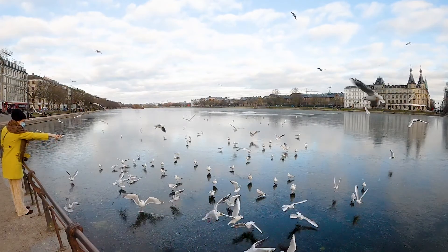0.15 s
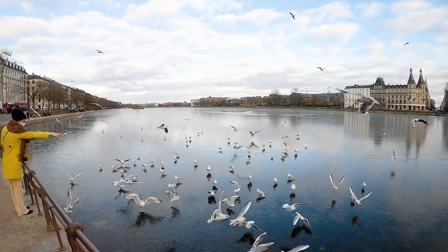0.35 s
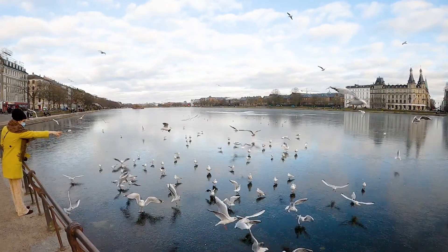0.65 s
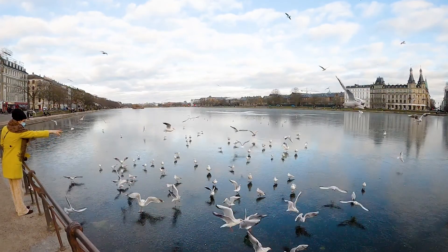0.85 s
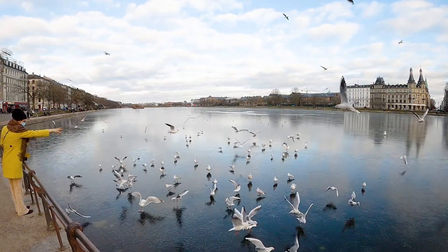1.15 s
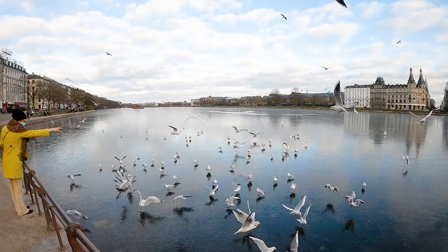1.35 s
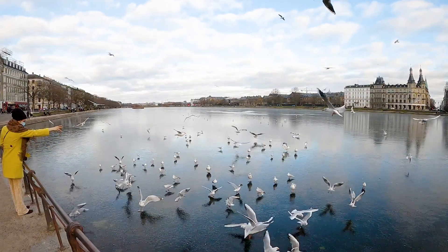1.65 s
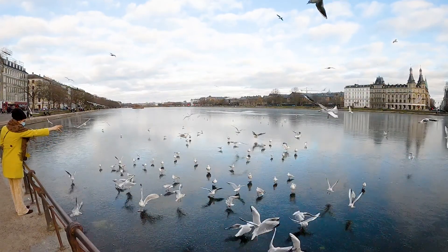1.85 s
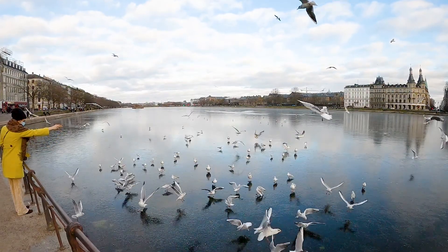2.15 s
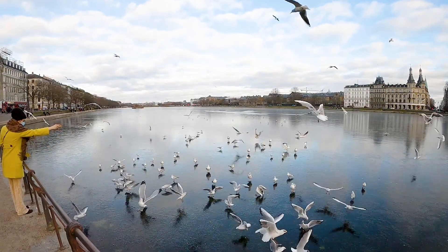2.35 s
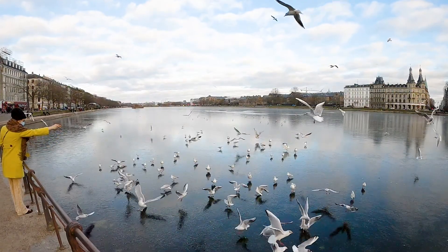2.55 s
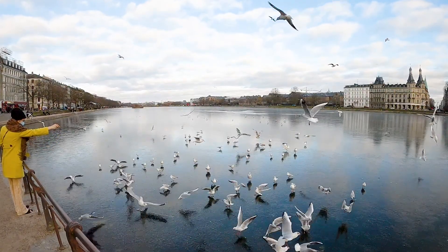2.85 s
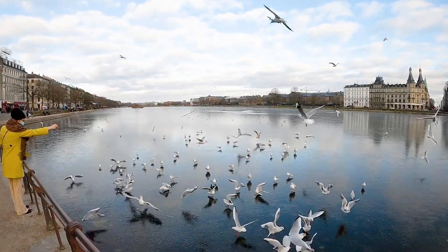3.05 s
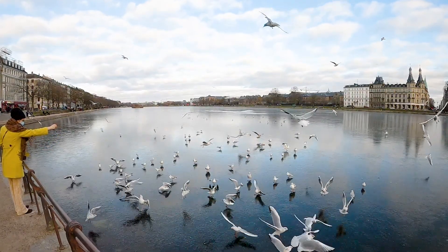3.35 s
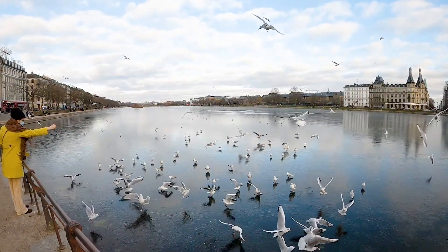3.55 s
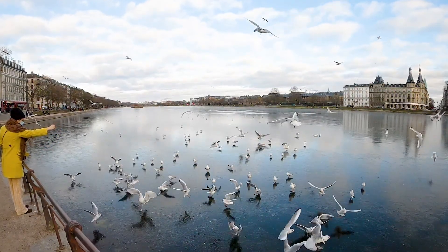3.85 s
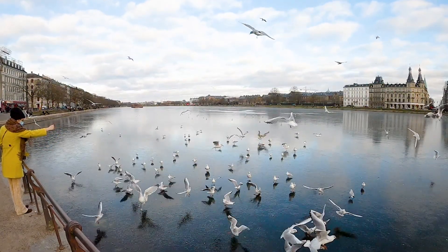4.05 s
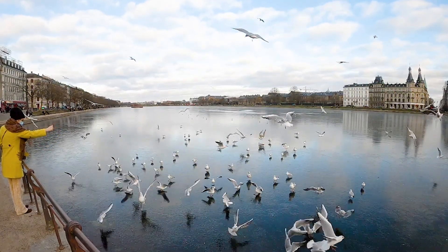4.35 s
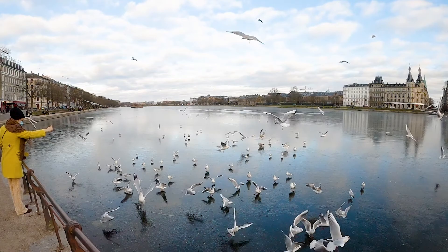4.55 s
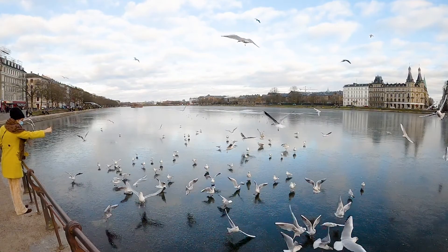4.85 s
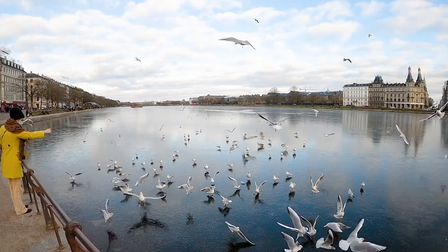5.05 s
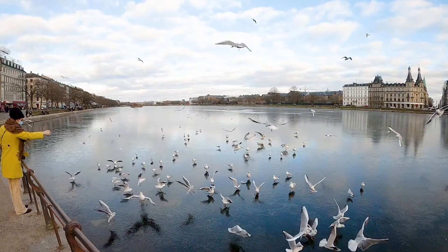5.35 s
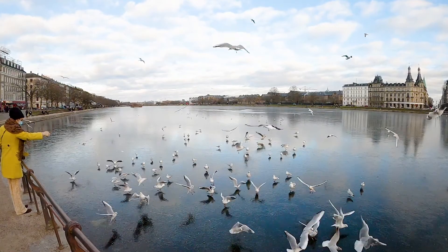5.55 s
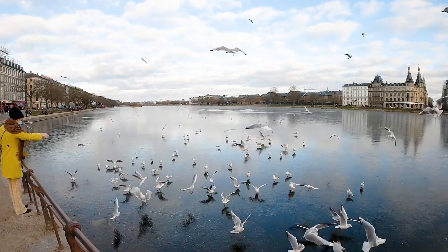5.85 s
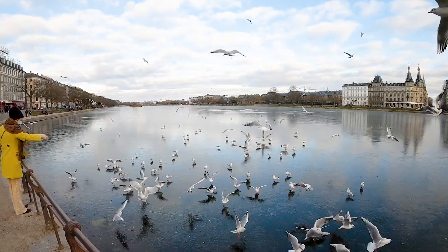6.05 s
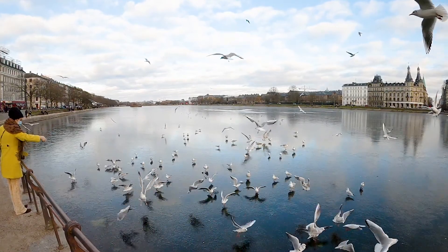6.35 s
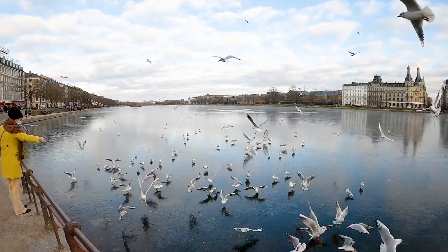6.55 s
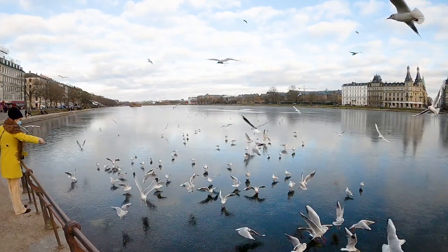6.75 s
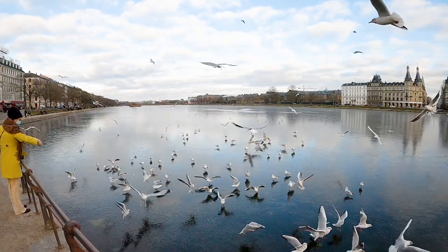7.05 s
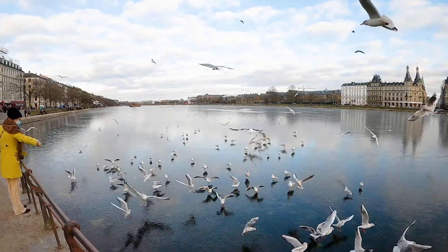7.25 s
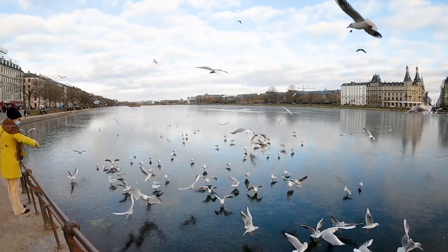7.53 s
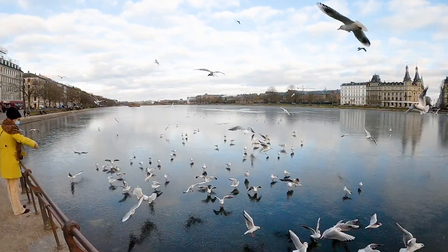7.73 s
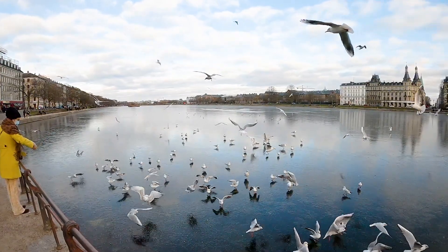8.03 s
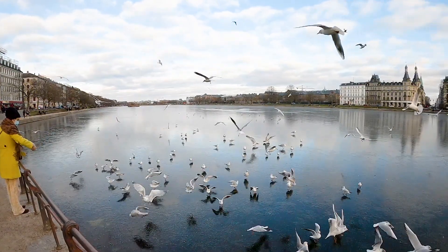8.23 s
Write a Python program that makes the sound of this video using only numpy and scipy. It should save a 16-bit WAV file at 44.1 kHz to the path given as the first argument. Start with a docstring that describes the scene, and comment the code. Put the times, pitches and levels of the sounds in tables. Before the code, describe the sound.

Gulls squabble over food on a frozen city lake, harsh rasping calls bunching into a loud growling peak, over a low distant town hum.

```python
"""Two claw ticks on ice over a town's far rumble and hum, then gulls squabbling over bread at a frozen city lake.
A small mono microphone hears it all: rasps are pulse trains chopped by a flutter and rung through chest, throat
and beak; whistles and cries are stacks of harmonics on bending pitches; claws and beaks are short noise cracks.
Duller rasps further out make the crowd, the shore returns a short tail, and shaped noise and a wavering tone
make the town."""
import sys
import numpy as np
from scipy import signal
from scipy.fft import rfft, irfft, next_fast_len
from scipy.io import wavfile
from scipy.ndimage import uniform_filter1d

SR = 44100
rng = np.random.default_rng(int(sys.argv[2]) if len(sys.argv) > 2 else 0)


def put_to_file(sound):
    """Save the sound as 16-bit audio at rate SR, in the file named by the first command-line argument."""
    columns = np.atleast_2d(sound).T  # one column per channel
    safe = np.clip(columns, -1, 1)
    whole_steps = np.round(safe * 32767)
    wavfile.write(sys.argv[1], SR, whole_steps.astype(np.int16))


N = 369999  # samples

# Spectrum of the distant town and microphone hiss, set to TOWN_DB overall.
# Each row: frequency in Hz, relative density in dB per Hz.
TOWN_SPECTRUM = [(15, -1.5), (54, 1.5), (100, -6.5), (360, -16.5), (664, -19), (1000, -18.5), (1600, -23),
                 (2400, -35.5), (3900, -36), (6100, -45.5), (7600, -32), (10000, -39.5), (15000, -41.5)]
# Heavy traffic swelling in the bass. Each row: time in seconds, change of level in dB.
TRAFFIC_SWELL = [(0, 4), (1.001, 0), (2.501, 2.5), (2.901, 2.5), (3.5, -1), (7.799, -4), (8.39, 0)]
# The far machine hum. Each row: time in seconds, level in dB.
HUM_LEVEL = [(0.0, -53.5), (1.31, -53.5), (2.45, -50.5), (3.74, -49.5), (3.76, -58.5), (4.49, -45),
             (7.219, -54), (7.27, -60), (8.39, -59)]
# How loudly the birds further out join in. Each row: time in seconds, gain in dB.
CROWD_GAIN = [(0, -63.5), (1.1, -59.5), (1.4, -39), (1.9, -39.5), (2.2, -39.5), (2.5, -44), (2.65, -52.5),
              (3.7, -63.5), (4.3, -88), (5.5, -54.5), (5.9, -48.5), (6.05, -37.5), (6.36, -45.5),
              (6.7, -69), (7.35, -83), (7.62, -53.5), (7.95, -68.5), (8.39, -65)]
# Claws and beaks on the ice. Each row: start in seconds, nominal peak in dB.
ICE_TICKS = [(0.0205, -33), (0.043, -29.5), (2.951, -17.5), (3.0164, -21.5), (3.384, -29.5), (3.8, -33),
             (7.4672, -27), (7.699, -29.5), (7.83, -32), (8.325, -33)]
# Whistles, nearly pure. Each row: nominal start and end in seconds, first, middle and last pitch in Hz,
# swell from start to end in dB, level in dB.
WHISTLE_CALLS = [(0.04, 0.07, 5060, 6740, 7670, 21, -44.5), (0.06, 0.108, 2450, 2578, 2670, 1, -53),
                 (1.328, 1.38, 3420, 3710, 3700, 13, -26.5), (1.384, 1.582, 4235, 4317, 4420, -21, -30.5),
                 (1.556, 1.609, 4200, 4344, 3990, -4, -23.5), (1.637, 1.703, 3800, 3570, 3360, -16, -25.5),
                 (1.709, 1.791, 3500, 2886, 2480, 5, -29), (1.65, 1.865, 2172, 2140, 2140, -1, -36),
                 (1.857, 1.918, 1345, 1210, 1440, 3, -33.5), (1.911, 2.022, 2170, 2227, 2350, 0, -29),
                 (1.931, 1.992, 3540, 3600, 3770, -2, -23), (2.067, 2.098, 8266, 7700, 7230, 9, -35.5),
                 (2.082, 2.119, 2640, 2490, 2510, 6, -18), (2.365, 2.41, 5460, 5450, 5440, 2, -47),
                 (2.59, 2.632, 6400, 6300, 6300, 2, -47), (1.446, 1.53, 1000, 1005, 937, 2, -34.5),
                 (1.7, 1.711, 3920, 3870, 3720, -3.5, -23.5), (4.026, 4.146, 3870, 4240, 3960, -10.5, -52),
                 (4.09, 4.244, 3040, 3003, 2920, 10, -47), (4.123, 4.21, 3710, 3910, 3830, 7, -49.5),
                 (4.196, 4.235, 3650, 3520, 3430, 13, -42.5), (5.935, 5.957, 2320, 2200, 2180, -14, -30),
                 (7.722, 7.758, 6000, 5950, 5600, 8, -51), (5.896, 5.915, 2230, 2230, 2197, -7, -32.5),
                 (6.321, 6.355, 3200, 3180, 3150, 3, -24), (6.378, 6.416, 8030, 7800, 7300, -19, -42),
                 (6.432, 6.469, 7150, 7480, 7050, -1, -47), (7.135, 7.185, 5130, 5000, 4965, -6, -53),
                 (7.42, 7.442, 5950, 7230, 7350, 4, -50), (7.684, 7.72, 4200, 4150, 4050, 0, -51),
                 (7.72, 7.746, 3720, 3720, 3580, 0, -48)]
# Cries, rich in harmonics. Each row: nominal start and end in seconds, first, middle and last pitch in Hz,
# swell from start to end in dB, level in dB, beak ring in Hz, fall away from it in dB per octave,
# second ring in Hz and its relative level in dB, roughness from 0 to 1.
CRY_CALLS = [(0.173, 0.367, 992, 983, 944, -4.5, -34, 4000, 61, 8130, -10.5, 0.085),
             (0.154, 0.283, 2960, 2870, 2910, -12, -56.5, 2940, 30, 5800, -6, .1),
             (0.277, 0.397, 2890, 2890, 2880, 10, -49, 2900, 13, 5800, 2, 0.072),
             (0.384, 0.585, 1410, 1400, 1375, -5, -50, 2803, 45, 5640, 7.5, 0.032),
             (1.299, 1.414, 764, 754, 736, -11, -30, 1540, 19, 2950, -5.5, 0.078),
             (2.142, 2.172, 490, 489, 482, 8, -23, 2000, 34, 3800, -7.5, 0.5),
             (3.928, 3.968, 2960, 2700, 2690, 10, -31.5, 2700, 26, 5400, -9, 0.078),
             (3.971, 4.039, 3200, 3044, 3130, -7, -34, 3054, 24, 6100, -18.5, .1),
             (4.235, 4.401, 2910, 2848, 2770, -2, -38, 2870, 24, 5740, -15.5, 0.048),
             (5.572, 5.749, 1197, 1236, 1184, 3.5, -41, 2180, 9.7, 3620, -3.5, 0.31),
             (5.736, 5.94, 2980, 2970, 2790, 12, -37, 2950, 24, 5900, -18, 0.43),
             (5.747, 5.922, 4240, 4290, 4150, 4, -47, 4220, 24, 8500, -15, 0.69),
             (5.751, 5.988, 1278, 1303, 1203, -6, -42.5, 1280, 24, 2600, -12, 0.78),
             (5.997, 6.116, 720, 685, 664, -11.5, -32.5, 2560, 13.4, 5500, -7.5, 0.3),
             (6.087, 6.268, 1113, 1105, 1030, 4, -27, 3100, 27, 5360, -12, .2),
             (6.191, 6.346, 427, 450, 391, -5, -39, 890, 14.5, 1700, -25, 0.098),
             (6.271, 6.313, 625, 636, 644, 14, -36, 3200, 30, 6160, -8, 0.33),
             (6.789, 6.819, 882, 850, 800, -4, -32.5, 1740, 28, 3480, -9.5, 0.39),
             (6.862, 6.896, 2260, 2180, 2180, 10, -35, 2170, 30, 6500, -18, 0.092),
             (6.899, 7.255, 2141, 2073, 1950, -16, -40.5, 2100, 16, 7550, -15, 0.029),
             (7.44, 7.46, 1230, 1210, 1210, 5, -54, 2418, 21, 4800, 8, 0.49),
             (7.454, 7.5, 1343, 1335, 1310, 10, -43, 2620, 18, 5130, 1.5, 0.65),
             (7.557, 7.68, 990, 972, 894, -7, -49.5, 3850, 48, 4770, -5, 0.66),
             (7.737, 7.794, 744, 695, 700, 8, -52, 2860, 23, 5030, -4, 0.72),
             (7.787, 7.858, 679, 676, 720, 5, -39, 2840, 44, 5170, -5, 0.23)]
# Harsh calls of the near gulls. Each row: loudest throb in seconds, rise and fall in seconds, mean pitch in Hz,
# glide in percent, level in dB, chest in dB, middle throat ring in Hz, throb rate in Hz, throb depth from 0 to 1.
RASP_CALLS = [(0.239, 0.044, 0.028, 612, 2, -47, 16, 3040, 58.6, 0.4),
              (0.684, 0.034, 0.034, 728, -4.5, -40.5, 12.5, 2840, 63, 0.5),
              (0.873, 0.04, 0.039, 826, 5, -21, -4, 2400, 59, 0.84),
              (1.073, 0.035, 0.028, 699, -3.5, -13.5, -8.5, 2300, 81, 0.78),
              (1.194, 0.052, 0.039, 884, -2.5, -9, -4.5, 3260, 65, 0.6),
              (1.281, 0.047, 0.09, 838, -1.5, -9.5, -1, 3000, 64.5, 0.6),
              (1.494, 0.057, 0.033, 1083, -2, -7.5, -7, 3220, 84, 0.6),
              (1.655, 0.1, 0.14, 738, 5, -22.0, -6, 3250, 56.3, 0.54),
              (1.755, 0.043, 0.023, 899, -0.5, -7.5, -16, 2570, 43.3, 0.25),
              (1.823, 0.059, 0.058, 813, 3.5, -26, 3, 2460.0, 60.0, 0),
              (1.952, 0.094, 0.13, 1055, 7.0, -17, -4.5, 3000, 64, 0),
              (2.072, 0.045, 0.1, 935, 0, -14, 0.5, 2680, 59, 0.7),
              (2.217, 0.048, 0.15, 312.7, -2, -6, -8, 3030, 136, 0.65),
              (2.32, 0.056, 0.088, 291.7, 1.5, 0, -22, 2830, 59, 0.64),
              (2.399, 0.067, 0.044, 326.8, 1, -6.5, -6, 3150, 53.7, 0.83),
              (2.451, 0.019, 0.078, 282, 0.0, -4, -16, 3220, 46, 0.13),
              (2.53, 0.039, 0.046, 891, 4.0, -10, -2, 2740, 67.3, 0.8),
              (2.708, 0.051, 0.041, 914, 4, -26, 3.5, 2650, 60, 0.6),
              (2.797, 0.067, 0.074, 883, -4, -20, 0.5, 2720, 58, 0.68),
              (3.027, 0.061, 0.034, 583, 13.5, -18.5, -37, 2130, 67, 0.67),
              (3.078, 0.045, 0.039, 764, -4, -23, -1.5, 2660, 66.83, 0.8),
              (3.333, 0.059, 0.029, 734, 2.5, -23.5, 1, 2720, 64.6, 0.7),
              (3.521, 0.061, 0.039, 692, -0.5, -29, 2, 3170, 53, 0.75),
              (3.572, 0.034, 0.048, 837, 8, -19.5, 1, 2650, 69, 0.6),
              (3.628, 0.065, 0.026, 1025, 9, -43.5, 21.5, 2480.0, 66, 1),
              (3.856, 0.047, 0.031, 727, 19.5, -31, 8, 3460, 63, 0.7),
              (4.688, 0.03, 0.042, 860, 3, -27, 2.5, 3540, 68, 0.96),
              (4.872, 0.051, 0.05, 830, -0.5, -19, -1, 3070, 57, 1),
              (4.947, 0.043, 0.053, 632.5, 1.5, -28.5, 4.5, 2640, 65, 1),
              (5.022, 0.022, 0.012, 685.4, 5, -30, -3, 3700, 47.0, 0.7),
              (5.102, 0.025, 0.019, 800, -0.5, -38.5, 1, 3000, 70, 0.6),
              (5.164, 0.032, 0.029, 698, 1.5, -30.5, 9, 2960, 69, 0.99),
              (5.291, 0.026, 0.035, 713, -5.5, -21.5, 5.5, 3400, 82, 0.5),
              (5.346, 0.034, 0.022, 653, 3.5, -23, 3.5, 3600, 73.3, 0.9),
              (5.433, 0.034, 0.031, 589, 0, -35.5, 9, 2470.0, 54, 0.8),
              (5.564, 0.04, 0.047, 691, 3, -32.5, 8, 2940, 62, 0.74),
              (5.702, 0.038, 0.038, 742, 0.5, -25, -24, 2986, 60, 0.5),
              (5.774, 0.034, 0.087, 853, -1, -25.5, -14, 2980, 50.5, 0.7),
              (5.992, 0.067, 0.08, 1041, 0, -18, -1.5, 2670, 59, 0.25),
              (6.1, 0.038, 0.042, 674, -1.5, -19, -15, 3420, 126, 0.1),
              (6.194, 0.05, 0.022, 920, -3, -17, -4, 2800, 60, 0.5),
              (6.41, 0.054, 0.034, 661, -3, -17.5, -10, 2678, 61, 0.76),
              (6.499, 0.024, 0.013, 397, -0.5, -20.5, -11, 2950, 45.0, 0.6),
              (6.625, 0.046, 0.022, 875, 2.0, -24, -2, 2680, 52, 1),
              (6.819, 0.051, 0.044, 616, 10, -35.5, 3.5, 2970, 59.0, 0.2),
              (6.882, 0.029, 0.062, 835, -2.5, -25.5, -6, 2240, 52.7, 0.7),
              (7.107, 0.038, 0.055, 746, -3, -39, 21, 3020, 63.4, 0.8),
              (7.506, 0.039, 0.042, 855, 5.5, -18, -0.5, 3110, 63.5, 0.77),
              (7.559, 0.016, 0.032, 257, -0.5, -24, -4.5, 2900, 45.0, 0.17),
              (7.673, 0.03, 0.019, 1050, 3, -34.5, -4, 3068, 67, 0.5),
              (7.886, 0.041, 0.0094, 740, 2.0, -29, -3.5, 2820.0, 49.8, 0.99),
              (8.015, 0.04, 0.017, 729, 3, -35, 4.5, 2870, 86.5, 0.4),
              (8.177, 0.031, 0.021, 755, -4, -32.5, 1, 2620.0, 55, 0.97),
              (8.214, 0.035, 0.038, 637, 9.5, -56, 28.5, 2680.0, 64.64, 0.9),
              (8.301, 0.026, 0.035, 675, -3, -40.5, 3, 2930.0, 75.4, 0.82),
              (8.349, 0.024, 0.042, 737, 2.0, -26.5, -11, 2930.0, 55.6, 0.9)]

TOWN_DB, HUM_HZ = -38.5, 136.1
SHORE_T60_S, SHORE_DB = .45, -18
MIC_HZ, TOP_HZ = 7900, 15200  # treble roll-off and final cut

# Squeals: rings fall more steeply on their upper side; above VOICE_TOP_HZ harmonics lose extra dB per octave
STEEPER_ABOVE, FAINTEST_DB = 1.4, -36  # ratio; floor for harmonics before the extra loss
VOICE_TOP_HZ, TOP_FALL_DB = 6400, 10
# Whistles ring at their middle pitch (fall in dB per octave) and more weakly at the octave
WHISTLE_FALL_DB, WHISTLE_OCTAVE_DB, WHISTLE_ROUGH = 24, -24, .12

# Rasps
HOARSE, GROWL_HOARSE = .44, .22  # shares of breath and irregularity
PITCH_PER_EFFORT, SHAPE_WAVER_DB = 0.0701, 4
CHEST_WIDTH_HZ, THROAT_WIDTH_HZ, SHOULDER_HZ = 1040, 3200, 5200
GAPE_SWEEP = 0.065  # share of the throat ring either side of its middle, before the glide
EDGE_HZ, EDGE_WIDTH_HZ = 4130, 5000
EDGE_DB, EDGE_PER_CHEST, GROWL_EDGE_DB = -8, 0.34, -25.5
EDGE_PER_DB = 0.2758  # louder birds are brighter


def undb(db):
    """Turns decibels into an amplitude ratio."""
    return 10 ** (np.asarray(db) / 20)


def level(x, db):
    """Scales a sound by its own RMS, then by a level in dB."""
    return x * undb(db) / np.sqrt(np.mean(x ** 2))


def walk(rate, size):
    """Random levels held 1 / rate s and slewed twice, about a mean of zero; spread near 1."""
    hold = int(SR / rate)
    steps = np.repeat(rng.standard_normal(size // hold + 1), hold)
    smooth = 1.369 * uniform_filter1d(uniform_filter1d(steps, hold), hold)[:size]
    return smooth - smooth.mean()


def resonance(f, hz, width_hz):
    """A band-pass applied twice, gain 1 at the centre."""
    return 1 / (1 + 1j * (f ** 2 - hz ** 2) / (f * width_hz)) ** 2


def add(out, s, sound):
    """Mixes a sound in at time s."""
    i = int(s * SR)
    out[i:i + len(sound)] += sound[:len(out) - i]


def town():
    """Octave bands of far traffic and hiss that flicker slowly, and a wavering machine hum."""
    t = np.arange(N) / SR
    f = np.arange(1, N // 2 + 2) * SR / N
    hz, db = np.transpose(TOWN_SPECTRUM)
    density_db = np.interp(np.log(f), np.log(hz), db)
    noise = rfft(rng.standard_normal(N)) * undb(density_db) * (f > 8)
    swell_db = np.interp(t, *np.transpose(TRAFFIC_SWELL))
    traffic = 0
    for octave in range(4, 15):
        share = np.clip(1 - np.abs(np.clip(np.log2(f), 4, 14) - octave), 0, 1)
        # the swell lifts only the bands around 64 and 128 Hz
        flicker_db = .7 * walk(5, N) + (octave in (6, 7)) * swell_db
        traffic = traffic + irfft(noise * share, N) * undb(flicker_db)
    hum = np.sin(2 * np.pi * np.cumsum(HUM_HZ + .7 * walk(2.7, N)) / SR)
    hum_db = np.interp(t, *np.transpose(HUM_LEVEL))
    return level(traffic, TOWN_DB) + np.sqrt(2) * hum * undb(hum_db)


def shore(x):
    """Scattered echoes off ice, wall and house fronts: a short dull tail of decaying noise."""
    t = np.arange(int(.6 * SR)) / SR
    scatter = uniform_filter1d(rng.standard_normal(len(t)), size=2)
    tail = scatter * np.exp(-np.log(1000) * t / SHORE_T60_S)
    return signal.fftconvolve(x, tail / np.linalg.norm(tail) * undb(SHORE_DB))[:N]


def crowd():
    """Birds further out: overlapping duller rasps of every pitch."""
    out = np.zeros(N)
    for place, length, pitch, throb, size in rng.random((85, 5)):
        call = rasp(rise=0.01895 + 0.0359 * length, fall=0.039 + 0.037 * length,
                    hz=600 + 450 * pitch, glide=16 * (length - .5), db=11 + 6 * size, chest_db=1.5,
                    throat_hz=2500 + 800 * throb, throb_hz=48 + 30 * throb, depth=.7, top_hz=7000)
        add(out, place * N / SR, call)
    s, db = np.transpose(CROWD_GAIN)
    return out * undb(np.interp(np.arange(N) / SR, s, db))


def tick(db):
    """A claw or beak on ice: a crack of noise lasting a few milliseconds."""
    t = np.arange(800) / SR
    crack = uniform_filter1d(rng.standard_normal(len(t)), size=3)
    return crack * np.exp(-t / .003) * undb(db - 4)


def squeal(start, end, hz0, hz1, hz2, swell_db, db, ring_hz, fall_db, upper_hz, upper_db, rough):
    """A stack of harmonics, shaped by two rings, on a bending pitch that wavers and flutters."""
    u = np.linspace(-1, 1, int((end - start + 0.0066) * SR))
    size = len(u)
    hz = hz1 + (hz2 - hz0) / 2 * u + ((hz0 + hz2) / 2 - hz1) * u ** 2
    waver = (.001 + .007 * rough) * walk(45, size)
    flutter = (.003 + .003 * rough) * walk(300, size)
    phase = 2 * np.pi * np.cumsum(hz * (1 + waver + flutter)) / SR

    k = np.arange(1, max(13000 // hz1, 1) + 1)

    def away(octaves):
        """Loss in dB at a distance from a ring."""
        return fall_db * np.maximum(-octaves, STEEPER_ABOVE * octaves)

    beak_db = -away(np.log2(k * hz1 / ring_hz))
    second_db = upper_db - away(np.log2(k * hz1 / upper_hz))
    harmonics_db = db + np.maximum(beak_db, second_db).clip(FAINTEST_DB)
    harmonics_db -= TOP_FALL_DB * np.log2(np.maximum(k * hz1 / max(VOICE_TOP_HZ, hz1), 1))
    tone = 0
    for n, harmonic_db in zip(k, harmonics_db):
        waver_db = (1.5 + 4.1 * rough) * walk(36 + 160 * rough, size)
        tone = tone + undb(harmonic_db + waver_db) * np.sin(n * phase + n * n)

    # a quick start; long calls die away more slowly
    attack = (1 + u) * size / (0.014 * SR)
    release = (1 - u) / np.maximum(.3, 0.016 * SR / size)
    fade = np.clip(np.minimum(attack, release), 0, 1)
    return np.sqrt(2) * tone * fade * undb(swell_db * u / 2 + (1 + 5 * rough) * walk(90, size))


def rasp(rise, fall, hz, glide, db, chest_db, throat_hz, throb_hz, depth, top_hz=14500):
    """Membrane pulses chopped by a slow flutter, rung through chest, throat and beak."""
    t = np.arange(-rise, fall, 1 / SR)
    along = np.linspace(0, 1, len(t))
    growl = hz < 500
    hoarse = GROWL_HOARSE if growl else HOARSE
    effort = np.interp(t, [-rise, .016 - rise, 0, fall - .012, fall], [0.099, 0.73, 1.0, 0.67, 0.14])
    flutter = 2 * np.pi * throb_hz * t + 0.3 * walk(55.3, len(t))
    closed = .5 - .5 * np.tanh(4 * (np.cos(flutter) + .4))
    gate = 1 - np.clip(depth, 0, 1) * closed

    # pitch bends inside every throb and climbs with effort, glides, wanders and trembles
    bend = .025 * depth * np.sin(flutter) + .016 * walk(55, len(t))
    bend += PITCH_PER_EFFORT * (effort - effort.mean()) + glide / 100 * (along - .5)
    tremble = 0.083 * hoarse * walk(500, len(t))
    phase = 2 * np.pi * np.cumsum(hz * (1 + bend + tremble)) / SR

    # the pulse changes shape as it goes: each harmonic has its own lag and wavering strength
    pulses = 0
    for k in range(1, int(top_hz / hz)):
        strength = undb(SHAPE_WAVER_DB * walk(71.7, len(t)))
        pulses = pulses + strength * np.cos(k * phase + 0.31 * rng.standard_normal())
    air = rng.standard_normal(len(t)) * (1 + np.cos(phase))  # breath bursts in time with the pulses
    source = level(pulses, 0) * undb(3.0 * hoarse * walk(400, len(t))) + .85 * hoarse * air
    throb_strength = undb(1.3 * walk(throb_hz, len(t)))
    voice = source * gate * effort * throb_strength

    size = next_fast_len(len(t) + 512)
    f = np.arange(1, size // 2 + 2) * SR / size
    # the chest favours the second harmonic of a high voice, within limits
    chest_hz = 1850 if growl else np.clip(2 * hz, 1200, 1800)
    chest = undb(chest_db) * resonance(f, chest_hz, CHEST_WIDTH_HZ)
    # the throat rings longer between the slow pulses of a growl, and is swept as the beak opens
    sweep_hz = throat_hz * (1 + (GAPE_SWEEP + glide / 100) * np.array([[-1], [1]]))
    throat = resonance(f, sweep_hz, min(THROAT_WIDTH_HZ, 1.9 * hz))
    shut, gaping = throat / (1 + (f / SHOULDER_HZ) ** 6)
    if growl:
        edge_db = GROWL_EDGE_DB
    else:
        edge_db = EDGE_DB + EDGE_PER_CHEST * chest_db + EDGE_PER_DB * np.clip(db + 4.5, -15, 8)
    edge = undb(edge_db) * resonance(f, EDGE_HZ, EDGE_WIDTH_HZ)

    body = rfft(voice * (1 - along), size) * shut + rfft(voice * along, size) * gaping
    body = body - rfft(voice, size) * chest
    # the treble edge grows faster with effort than the body does
    treble = rfft(voice * effort ** 0.63, size) * edge
    return irfft(body - treble, size) * undb(db)


def flock():
    """The near gulls: every call and tick, with a faint patter of small ticks between."""
    out = np.zeros(N)
    for place, size in rng.random((120, 2)):
        add(out, place * N / SR, tick(-60 - 4 * np.log(size)))
    for s, db in ICE_TICKS:
        add(out, s, tick(db))
    for call in WHISTLE_CALLS:
        hz = call[3]
        whistle = squeal(*call, hz, WHISTLE_FALL_DB, 2 * hz, WHISTLE_OCTAVE_DB, WHISTLE_ROUGH)
        add(out, call[0] - .004, whistle)
    for call in CRY_CALLS:
        add(out, call[0] - .004, squeal(*call))
    for loudest, rise, *voice in RASP_CALLS:
        add(out, loudest - rise, rasp(rise, *voice))
    return out


def scene():
    """Birds, shore and town reach one microphone, which feeds both channels."""
    birds = flock() + crowd()
    return np.tile(birds + shore(birds) + town(), (2, 1))


def record(dry):
    """The microphone: peaks round off; the treble rolls off steeply; the top is cut."""
    rounded = np.tanh(1.3 * dry) / 1.3
    mic = signal.sosfilt(signal.butter(6, MIC_HZ, fs=SR, output="sos"), rounded)
    return signal.sosfilt(signal.ellip(8, .2, 60, TOP_HZ, fs=SR, output="sos"), mic)


dry = scene()
out = record(dry)
put_to_file(out)
```